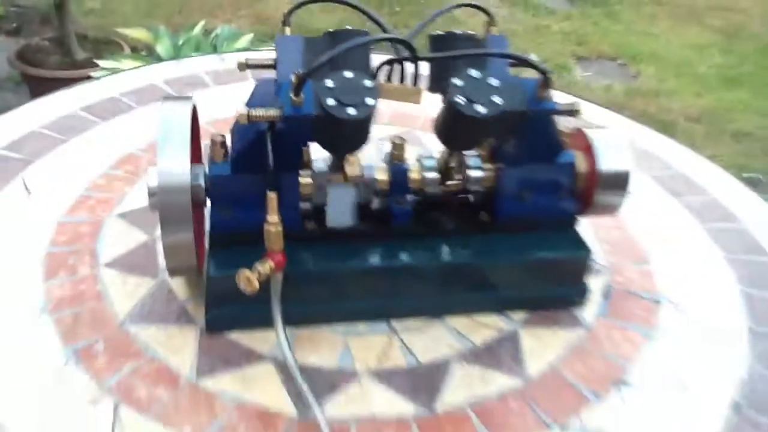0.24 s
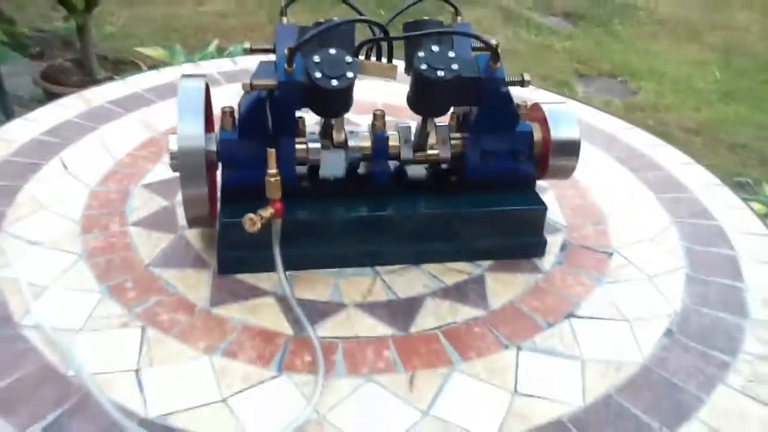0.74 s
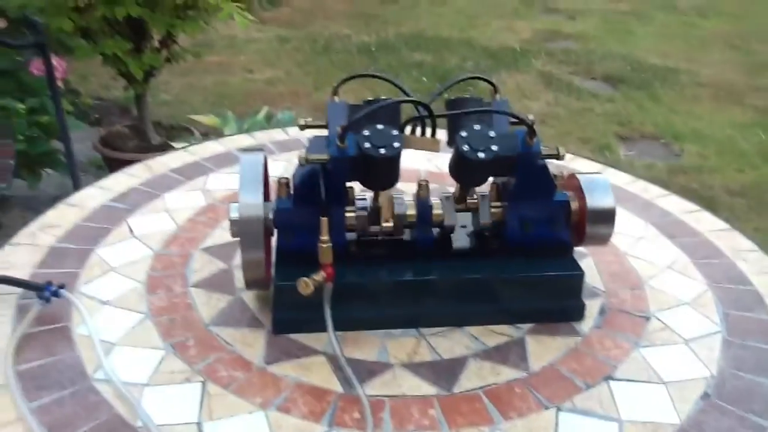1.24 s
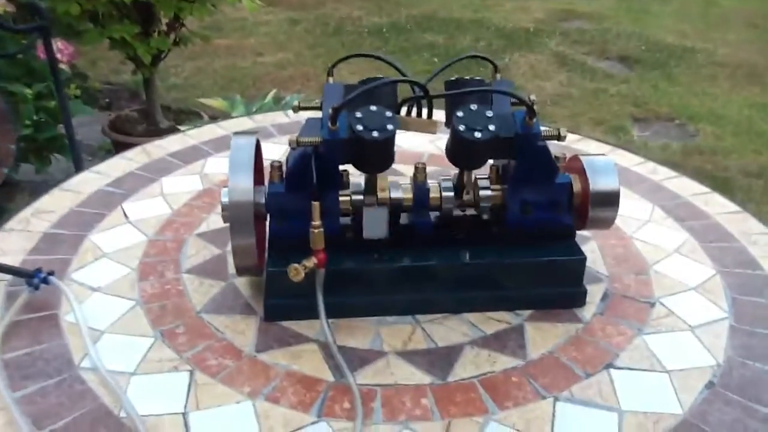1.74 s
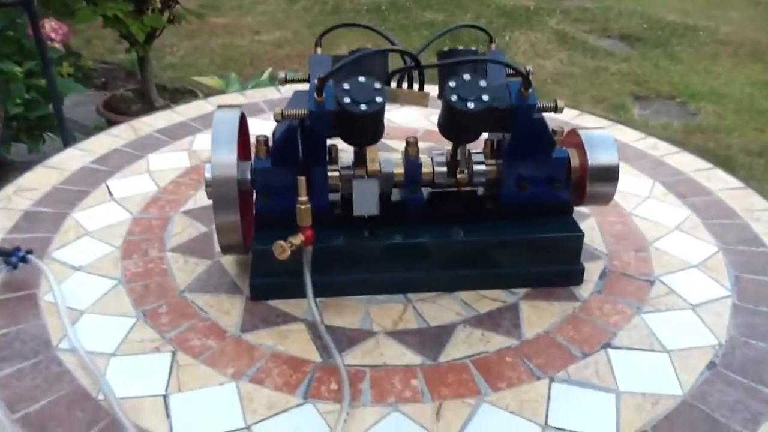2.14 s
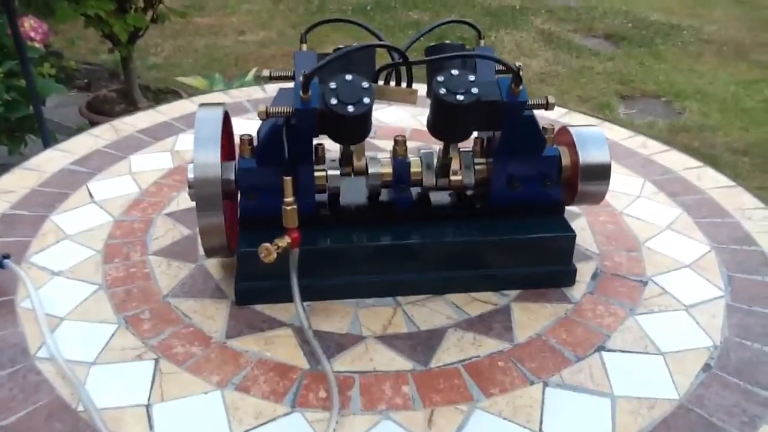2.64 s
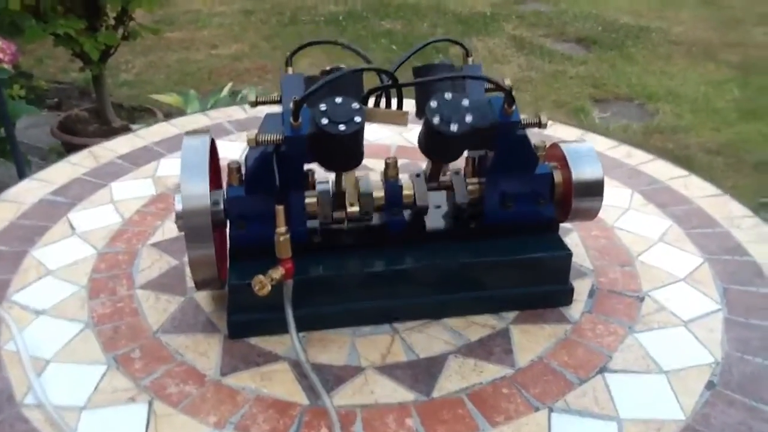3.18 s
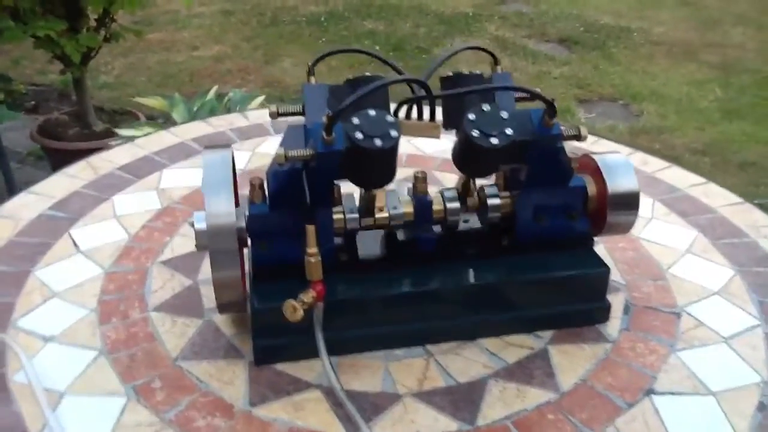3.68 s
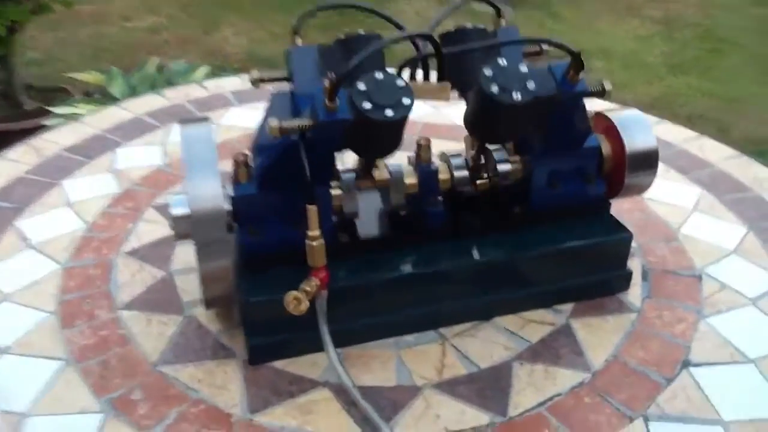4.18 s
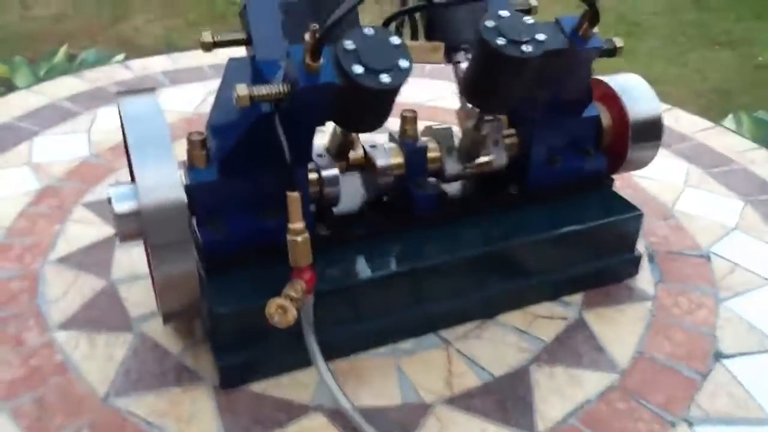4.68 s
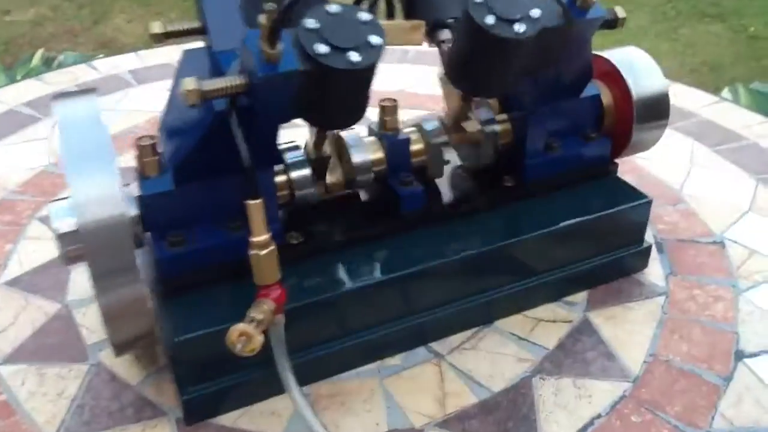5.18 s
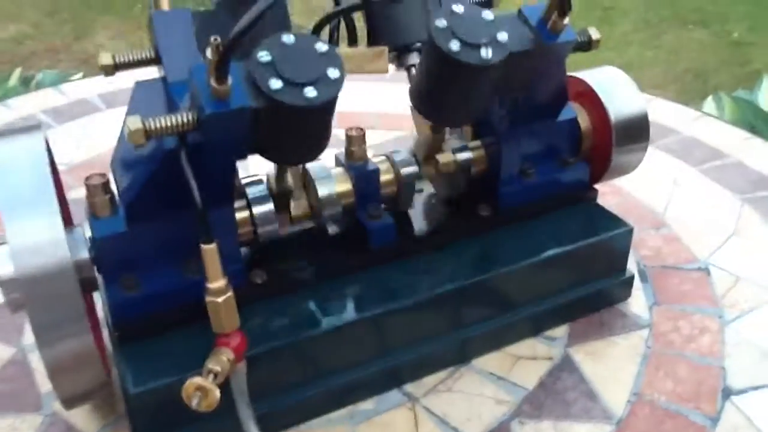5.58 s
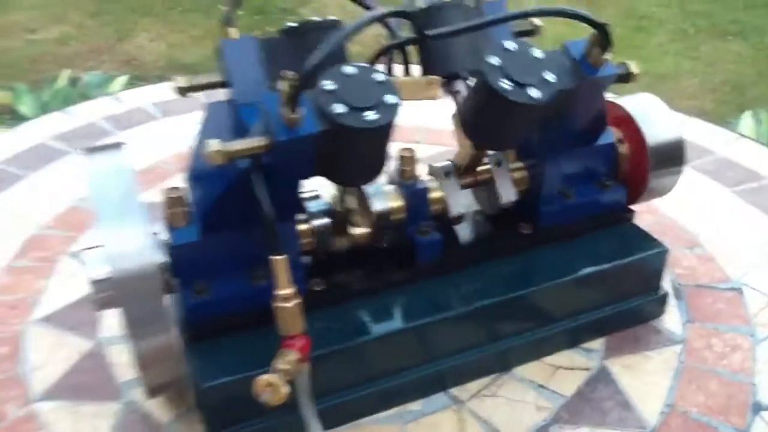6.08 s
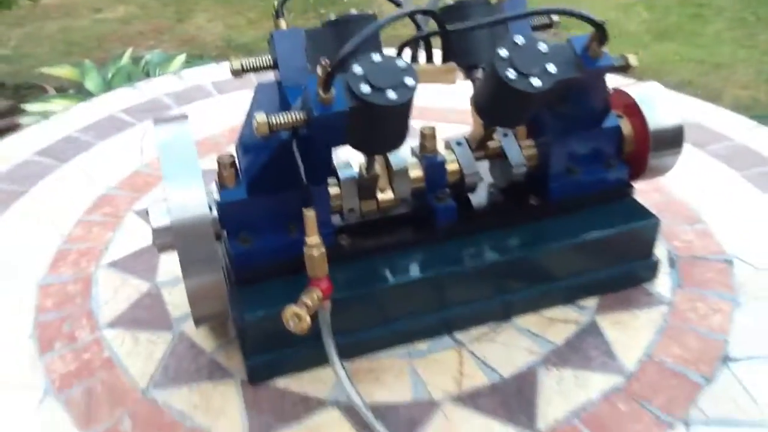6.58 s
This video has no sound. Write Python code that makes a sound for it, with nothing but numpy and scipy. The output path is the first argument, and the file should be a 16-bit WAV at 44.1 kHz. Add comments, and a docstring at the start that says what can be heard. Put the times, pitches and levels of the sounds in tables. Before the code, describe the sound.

From the start, a small two-cylinder model engine runs fast and evenly on compressed air on a garden table, over a soft outdoor background. Its hollow base gives a throbbing hum, about twenty-three pulses a second, with rapid valve ticking and irregular metallic knocks from a loose bearing. The air feed adds a faint tone, and the exhaust makes a high hiss that swells two or three times a second. Around 4 seconds the microphone comes closer, making the hum fuller and the hiss brighter. At 5.7 seconds the air is shut off with a sharp clack and a brief spit. The running stops almost at once, and the crank rocks to rest with a few short, round thumps until about 6 seconds. The hiss dies away. Two small metal clicks come at 6.3 and 6.4 seconds, the second with a low hollow plop.

```python
"""On a garden table, a two-cylinder model engine runs on compressed air as the microphone draws near.
Every turn the pistons shove the hollow base into a hum and the valves tick; a loose bearing knocks.
The air feed sings faintly, and spent air leaves the ports as a turbulent jet, hissing in slow swells.
The air is shut off with a clack, the crank rocks to rest, the hiss dies away and a hollow plop follows."""
import sys
import numpy as np
from scipy import signal
from scipy.fft import rfft, irfft
from scipy.io import wavfile

SR = 44100
rng = np.random.default_rng(int(sys.argv[2]) if len(sys.argv) > 2 else 0)


def wav_out(sig):
    """Save sig, one row per channel (or a flat mono array), as 16-bit PCM at SR to the path in sys.argv[1]."""
    wavfile.write(sys.argv[1], SR, np.round(np.clip(np.atleast_2d(sig).T, -1, 1) * 32767).astype(np.int16))


N = 300950
TIME = np.arange(N) / SR
TURNS_PER_S, TURN_COUNT = 23.258, 136
START_ANGLE_TURNS, AIR_OFF_S = -.0125, 5.698


def undb(db):
    """Amplitude grows tenfold for every 20 dB."""
    return 10 ** (np.asarray(db) / 20)

def curves(table):
    """Linear interpolation in time turns each column after the first into a curve."""
    s, *columns = np.transpose(table)
    return [np.interp(TIME, s, column) for column in columns]

def walk(rate_hz):
    """Interpolated random values wander with a spread near 1."""
    knots = np.arange(0, N / SR + 1, 1 / rate_hz)
    return 1.2 * np.interp(TIME, knots, rng.standard_normal(len(knots)))

def flutter(rate_hz):
    """Differencing random values leaves a quick shake with no slow drift."""
    knots = np.arange(0, N / SR + 1, 1 / rate_hz)
    return np.interp(TIME, knots[1:], np.diff(rng.standard_normal(len(knots))))

def noise(spectrum):
    """Spectral shaping colours white noise; the result has an rms of 1."""
    hz, db = np.transpose(spectrum)
    bin_hz = np.arange(N // 2 + 1) * SR / N
    gain = undb(np.interp(np.log(bin_hz + 1), np.log(hz), db, left=-90, right=-90))
    coloured = irfft(rfft(rng.standard_normal(N)) * gain, N)
    return coloured / coloured.std()

def ring(x, hz, width_hz):
    """A damped resonator passes a band, with unit gain at its centre."""
    return signal.lfilter(*signal.iirpeak(hz, hz / width_hz, fs=SR), x + 1e-18)

def body(x, modes, vary_db=0):
    """Modal superposition: neighbouring modes swing oppositely, and their drive wanders by vary_db."""
    return sum((-1) ** k * undb(db) * ring(x * undb(vary_db * walk(23)), hz, width)
               for k, (hz, width, db) in enumerate(modes))

def soften(x, hz):
    """A softer contact lasts longer and so carries less treble."""
    return signal.sosfilt(signal.butter(2, hz, fs=SR, output="sos"), x + 1e-18)

def cushion(x, hz):
    """An air cushion acts as a low-pass filter: it pushes without a click."""
    return signal.sosfiltfilt(signal.butter(6, hz, fs=SR, output="sos"), x + 1e-18)

def thin_bass(x):
    """A steep high-pass filter removes the deepest bass, below about 90 Hz."""
    return signal.sosfilt(signal.butter(6, 90, "high", fs=SR, output="sos"), x)

def blows(times, sizes):
    """A brief impact is idealised as an impulse."""
    return np.bincount(np.clip(np.ravel(times) * SR, 0, N - 1).astype(int), np.ravel(sizes), N)

def bursts(times, db, decay_s):
    """An envelope jumps at each time and decays exponentially."""
    return signal.lfilter([1], [1, -np.exp(-1 / (decay_s * SR))], blows(times, undb(db)) + 1e-18)

def each_turn(angles, sizes):
    """Steady rotation maps crank angles, one row per turn, to impulses while the air is on."""
    turn = np.arange(len(angles))[:, None] - 1
    times = (turn + angles - START_ANGLE_TURNS) / TURNS_PER_S
    return blows(times, sizes * (times > 0) * (times < AIR_OFF_S))

def crank_motion(coast_s=0.082):
    """Motion holds at 1 under air, then decays exponentially."""
    return np.exp(-np.maximum(TIME - AIR_OFF_S, 0) / coast_s)


# The outdoor spectrum. Each row: frequency in Hz, relative density in dB.
GARDEN_SPECTRUM = [(25, -28), (60, -26.5), (115, -2.5), (175, 1), (265, -2.5), (560, -9.5), (750, -12),
                   (1350, -16.5), (2600, -25), (4000, -21)]
def garden(db=-57):
    """Stationary noise, strongest in the bass, forms a soft outdoor background."""
    return undb(db) * noise(GARDEN_SPECTRUM)

def plop(start_s=6.421, db=-39, start_hz=250, end_hz=168, glide_s=0.012, length_s=0.053):
    """A damped tone with a fast downward glide is heard as a hollow plop."""
    age = np.maximum(TIME - start_s, 0)
    hz = end_hz + (start_hz - end_hz) * np.exp(-age / glide_s)
    phase = 2 * np.pi * np.cumsum(hz * (age > 0)) / SR
    return thin_bass(undb(db) * np.exp(-(age / length_s) ** 3) * np.sin(phase))

# The shaft's rumble. Each row: frequency in Hz, relative density in dB.
RUMBLE_SPECTRUM = [(40, -43), (75, -21), (130, -33), (250, 4), (450, 3), (700, -2), (1500, -7.5),
                   (3000, -15)]
def bearings(near, db=-53.5, close_db=-57, close_hz=520, close_width_hz=130):
    """Structure-borne noise: the rolling shaft rumbles through the base, fuller close up."""
    close = ring(ring(noise(RUMBLE_SPECTRUM), close_hz, close_width_hz), close_hz, close_width_hz)
    rumble = undb(db) * noise(RUMBLE_SPECTRUM)
    return crank_motion() * (rumble + undb(close_db) * near * close / close.std())

# The feed's note. Each row: time in seconds, then relative levels in dB of the lower sideband,
# the carrier and the upper sideband.
FEED_TONES = [(0, -66, -60, -55), (.2, -66, -60, -56), (.6, -65, -64, -67), (2.3, -65, -75, -72),
              (3.1, -62, -71, -63), (3.6, -61, -62, -59), (4.3, -70, -62, -59), (4.9, -78, -59, -60),
              (5.5, -63, -57.5, -57.5), (5.74, -67, -60, -61), (5.95, -110, -110, -110)]
def air_feed(carrier_hz=634.8, db=0.5, waver_db=.5):
    """Modulation: the feed's note throbs once a turn, which puts a sideband on either side."""
    tones = [undb(tone_db) * np.sin(2 * np.pi * (carrier_hz + side * TURNS_PER_S) * TIME)
             for side, tone_db in zip((-1, 0, 1), curves(FEED_TONES))]
    return undb(db + waver_db * walk(24)) * sum(tones)

# Loose parts drop as the crank settles. Each row: time in seconds, relative level in dB.
SETTLING_CLICKS = [(6.329, -4), (6.421, 2)]
# Their modes. Each row: frequency in Hz, bandwidth in Hz, gain in dB.
LINKAGE_MODES = [(904, 29, 2), (1370, 25, 1), (2000, 55, -11), (3149, 36, -2), (3550, 120, -8),
                 (4000, 16, -1)]
def linkage(db=-7.0):
    """Free vibration: small metal parts ring after dropping into place."""
    s, click_db = np.transpose(SETTLING_CLICKS)
    return undb(db) * body(blows(s, undb(click_db)), LINKAGE_MODES)

# The air cock snaps shut. Each row: time in seconds, relative clack and spit levels in dB.
COCK_CONTACTS = [(5.702, 3.5, 2), (5.7133, -3.5, 0), (5.722, -16, -7)]
# Its modes. Each row: frequency in Hz, bandwidth in Hz, gain in dB.
COCK_MODES = [(1250, 100, 0.5), (2600, 160, 8), (3270, 1500, -18), (5500, 620, -15), (7900, 720, -6)]
# Its spit of air. Each row: frequency in Hz, relative density in dB.
SPIT_SPECTRUM = [(900, -20), (2500, -2), (3700, -5), (5500, -2), (9300, 0), (15500, -4)]
def air_cock(db=-24.0, scrape_s=0.0034, spit_db=-37.0, spit_s=0.0093):
    """Friction excites the modes of the brass cock in short scrapes, each with a spit of air."""
    s, clack_db, puff_db = np.transpose(COCK_CONTACTS)
    clack = body(bursts(s, clack_db, scrape_s) * rng.standard_normal(N), COCK_MODES)
    spit = bursts(s, puff_db, spit_s) * noise(SPIT_SPECTRUM)
    return undb(db) * clack + undb(spit_db) * spit

# The hiss between surges. Each row: time in seconds, relative level in dB.
HISS_FLOOR = [(0, -44), (1.1, -43.5), (2.6, -43.5), (3.7, -44), (4.3, -43), (5.1, -41.5), (5.7, -42)]
# Surges of air. Each row: start and end in seconds, rise in dB before the step and arch shares.
AIR_SURGES = [(0.03, 0.272, 4.5), (0.415, 0.652, 3.5), (.82, 1.035, 2), (1.193, 1.415, 2), (1.572, 1.8, 2),
              (1.967, 2.177, 2), (2.355, 2.57, 2), (2.76, 2.958, 2), (3.133, 3.363, 3.6), (3.53, 3.78, 3.7),
              (3.93, 4.18, 2.5), (4.35, 4.603, 2.5), (4.788, 5.013, 3), (5.202, 5.426, 4), (5.58, 5.84, 4),
              (6.017, 6.214, 1.8)]
def flow(step_share, arch_share, drain_db_per_s, drain_db_per_s2=6, edge_s=0.01):
    """Hiss follows flow: surges step up, arch and drop; after shut-off the pressure drains away."""
    surge_db = 0
    for opens, closes, rise_db in AIR_SURGES:
        step = (np.tanh((TIME - opens) / edge_s) - np.tanh((TIME - closes) / edge_s)) / 2
        arch = np.sin(np.pi * np.clip((TIME - opens) / (closes - opens), 0, 1))
        surge_db = surge_db + rise_db * (step_share * step + arch_share * arch)
    off_s = np.maximum(TIME - AIR_OFF_S, 0)
    drain_db = drain_db_per_s * off_s + drain_db_per_s2 * off_s ** 2
    return undb(curves(HISS_FLOOR)[0] + surge_db - drain_db)

# The jet, its finest beamed hiss and its broad rush. Each row: frequency in Hz, relative density in dB.
JET_SPECTRUM = [(6000, -35), (7500, -6), (9200, 3.5), (11500, 5.5), (12800, 2.5), (14500, 3.5),
                (16000, -0.5)]
BEAM_SPECTRUM = [(10500, -27), (12500, -6), (14000, -1), (16000, 2)]
RUSH_SPECTRUM = [(700, -7), (1500, -6), (3500, -6.5), (4000, -3), (5300, -0.5), (6400, -0.5), (7500, 1.5),
                 (10000, -28)]
# Exhaust port resonances. Each row: frequency in Hz, bandwidth per stage in Hz, relative level in dB.
PORT_MODES = [(5150, 690, -18), (8490, 1100, -3.5), (13160, 870, -5.5), (14700, 1500, -12)]
def exhaust(near, beam_db=-4, rush_db=-8.0, port_db=-8.5, flutter_db=0.57, waver_db=1.7, drift_db=1.0):
    """Turbulence makes a fluttering hiss and excites the ports; beamed treble brightens it close up."""
    jet = flow(step_share=0.23, arch_share=0.58, drain_db_per_s=13.5) * noise(JET_SPECTRUM)
    beam = flow(step_share=0.64, arch_share=.7, drain_db_per_s=13.0) * noise(BEAM_SPECTRUM)
    rush = flow(step_share=0.58, arch_share=0.068, drain_db_per_s=10.5) * noise(RUSH_SPECTRUM)
    port_gain = undb(port_db) * flow(step_share=1.65, arch_share=.15, drain_db_per_s=6.0)
    air = jet + undb(beam_db) * near * beam + undb(rush_db) * rush
    for hz, width, db in PORT_MODES:
        port = ring(ring(rng.standard_normal(N), hz, width), hz, width)
        level_db = db + waver_db * flutter(40) + drift_db * walk(9)
        air = air + port_gain * undb(level_db) * port / port.std()
    return air * undb(flutter_db * flutter(70))

# Hard knocks. Each row: time in seconds, then drive in dB to the low, middle and high crank modes.
HARD_KNOCKS = [(.036, -2, -8, -21), (0.163, -9, 0, -20), (.207, -4, -6, -9), (.335, -14, -6, -16),
               (0.553, -2, -15, -10), (.594, -2, -6, -13), (.681, -3, -4, -9), (.98, -2, -18, -11),
               (1.068, -18, -8, -18), (1.153, -15, -5, -8), (1.325, -2, -7, -14), (1.712, -20, 0, -18),
               (1.927, 0, -4, -11), (2.229, -1, -21, -20), (2.272, -18, -3, -18), (2.4, -3, -16, -20),
               (2.487, -11, -2, -8), (2.616, -3, -1.5, -18), (2.658, -2, -3, -7), (2.743, -5, -15, -8),
               (2.788, -14, -6, -7), (2.872, -10, -2, -8), (3.086, -9, -5, -20), (3.175, -15, -8, -15),
               (3.303, -10, -8, -15), (3.434, -1, -15, -18), (3.474, -7, -7, -20), (3.605, -21, -11, -3),
               (4.034, 1, -9, -20), (4.206, -8, -5, -7), (4.378, 0, -13, -5), (4.464, -10, 1, -14),
               (4.509, 5.5, -10, -20), (4.807, -20, -6, -5), (4.895, 6, -15, -3), (4.978, -3, -2, -15),
               (5.066, -12, 1, -13), (5.11, -19, -4, -13), (5.152, -23, -5, -16), (5.196, -15, -6, -17),
               (5.28, -15, -5, -18), (5.41, -17, -9, -12), (5.498, -2, -15, -15), (5.668, -6, -2, -20)]
# The crank's modes. Each row: frequency in Hz, bandwidth in Hz, gain in dB.
CRANK_MODES = [(1200, 115, -0.5), (1717, 70, 2.5), (2360, 130, -4)]
def bearing_knocks():
    """Impact excitation: each hard knock of the loose bearing rings a different mix of crank modes."""
    s, *drive_db = np.transpose(HARD_KNOCKS)
    return sum((-1) ** k * ring(blows(s, undb(mode_db + drive_db[k])), hz, width)
               for k, (hz, width, mode_db) in enumerate(CRANK_MODES))

# The crank rocks to rest. Each row: time in seconds, relative shove and contact levels in dB,
# pitch in Hz, bandwidth in Hz, relative thump level in dB.
FINAL_STROKES = [(5.7098, 8, -16, 423, 23, 6), (5.786, -6, -8, 436, 80, -7), (5.803, -1.5, -25, 423, 26, 4),
                 (5.889, -2, -24, 428, 24, 0), (6.031, -14.5, -27.5, 323, 35, -20),
                 (6.422, -11, -12, 386, 24, -21)]
def rocking(db=17, push_width_hz=90, thump_hz=200, thump_width_hz=45):
    """Transient response: each slow last stroke raises a short round note and thumps the table."""
    notes = 0
    for s, shove_db, _, hz, width, _ in FINAL_STROKES:
        push = ring(blows([s], undb(shove_db)), hz, push_width_hz)
        notes = notes + ring(push, hz, width)
    s, *_, thump_db = np.transpose(FINAL_STROKES)
    thumps = soften(blows(s, undb(thump_db)), 2 * thump_hz)
    return undb(db) * notes + thin_bass(ring(thumps, thump_hz, thump_width_hz))

# Metal contacts in one turn. Each row: crank angle in turns, relative level in dB,
# timing spread in turns, treble cutoff in Hz.
TURN_CONTACTS = [(.02, -14.5, 0.024, 1120), (.09, -13, 0.035, 2000), (.335, -5, 0.0081, 900),
                 (0.372, -11.5, 0.0082, 1310), (0.566, -11, 0.007, 1020), (0.707, -13.5, 0.015, 2500),
                 (.76, -10, 0.0057, 3380), (0.788, -9, 0.0142, 3550), (0.819, -12, 0.021, 3020),
                 (0.876, -17.5, 0.021, 1800)]
# Crankcase modes, then those heard close up. Each row: frequency in Hz, bandwidth in Hz, gain in dB.
CASE_MODES = [(638.5, 51, 6.5), (772, 73, 3), (831, 85, 5), (1035, 100, 4.5), (1280, 57, 1.5),
              (1517, 56, -2), (1740, 80, 2.5), (2220, 56, -3), (2500, 63, -3), (3020, 160, -9),
              (4140, 710, -10.5)]
CLOSE_CASE_MODES = [(1226, 100, 6), (2450, 200, -6)]
# The clatter at the moving microphone. Each row: time in seconds, relative level in dB.
CLATTER_LEVELS = [(0, -48.5), (1.2, -50), (3.3, -50), (4.4, -49.5), (5.65, -54)]
def clatter(near, scatter_db=0.5, rub_db=-46, gain_db=0.67):
    """Impact and friction: tapping valves, the loose bearing and sliding parts ring the crankcase."""
    drive = undb(rub_db) * crank_motion() * rng.standard_normal(N)
    for angle, db, play, cutoff_hz in TURN_CONTACTS:
        late, strong = rng.standard_normal((2, TURN_COUNT, 1))
        taps = each_turn(angle + play * late, undb(db + scatter_db * strong))
        drive = drive + soften(taps, cutoff_hz)
    s, _, contact_db, *_ = np.transpose(FINAL_STROKES)
    case = body(drive + blows(s, undb(contact_db)), CASE_MODES, vary_db=1.96)
    case = case + near * body(drive, CLOSE_CASE_MODES)
    running_rms = np.sqrt(np.mean(case[TIME < AIR_OFF_S] ** 2))
    return case / running_rms * undb(curves(CLATTER_LEVELS)[0] + gain_db)

def cylinder_hum(db=-29.0, start_hz=461.5, sag_hz_per_s=1415, angle_turns=.7852,
                 attack_s=0.0021, length_s=0.0276, scatter_db=0.6, detune=0.004):
    """A growing cavity falls in pitch: one round note a turn sags as the cylinder opens."""
    turns = TIME * TURNS_PER_S + START_ANGLE_TURNS + 1 - angle_turns
    turn = np.clip(turns.astype(int), 0, TURN_COUNT - 1)
    age = turns % 1 / TURNS_PER_S
    strong, sharp = rng.standard_normal((TURN_COUNT, 2))[turn].T
    envelope = (1 - np.exp(-age / attack_s)) * np.exp(-(age / length_s) ** 3) * (TIME - age < AIR_OFF_S)
    cycles = start_hz * (1 + detune * sharp) * age - sag_hz_per_s * age ** 2 / 2
    return undb(db + scatter_db * strong) * envelope * np.sin(2 * np.pi * cycles)

# Piston shoves in one turn. Each row: crank angle in turns, relative force.
PISTON_SHOVES = [(.685, 1.15), (.778, .19), (.806, .35), (.889, .96), (1.005, .4)]
# Modes of the base and table. Each row: frequency in Hz, bandwidth in Hz, gain in dB.
BASE_MODES = [(179.8, 23, -.5), (247.2, 71.6, 10), (276.1, 130, 10.7), (428.2, 26.1, 12), (469, 22, 11.5),
              (541.7, 22, 4), (94, 14, -3)]
def pistons(near, play_turns=0.0005, scatter_db=.7, base_db=-0.1, closer_db=-0.9,
            hum_mode=3, handover_db=-8.3, push_hz=800, cushion_hz=660):
    """Forced vibration: shoves ring the base; close up the hum takes over from its strongest mode."""
    angle, force = np.transpose(PISTON_SHOVES)
    late, strong = rng.standard_normal((2, TURN_COUNT, len(PISTON_SHOVES)))
    shoves = each_turn(angle + play_turns * late, force * undb(scatter_db * strong))
    drive = cushion(soften(shoves, push_hz), cushion_hz)
    modes = [(hz, width, db + (k == hum_mode) * handover_db * near)
             for k, (hz, width, db) in enumerate(BASE_MODES)]
    hum = near * cylinder_hum()
    base = undb(base_db + closer_db * near) * body(drive, modes, vary_db=0.36)
    return hum - thin_bass(base)

# The microphone comes closer. Each row: time in seconds, share of the close sound in dB.
NEARNESS = [(0, -38), (3.0, -33), (3.7, -27), (4.0, -8.5), (4.5, -7), (5.3, -4.3), (5.7, -4.6)]
def scene():
    """Superposition: engine, air and garden add up to one signal, the same in both channels."""
    near = undb(curves(NEARNESS)[0])
    engine = pistons(near) + rocking() + clatter(near) + bearing_knocks() + bearings(near) + linkage()
    mono = engine + air_feed() + exhaust(near) + air_cock() + plop() + garden()
    return np.array([mono, mono])

def record(dry, cutoff_hz=15380):
    """Band limiting: a steep low-pass filter removes the highest treble."""
    return signal.sosfilt(signal.ellip(12, .1, 90, cutoff_hz, fs=SR, output="sos"), dry)


dry = scene()
out = record(dry)
wav_out(out)
```